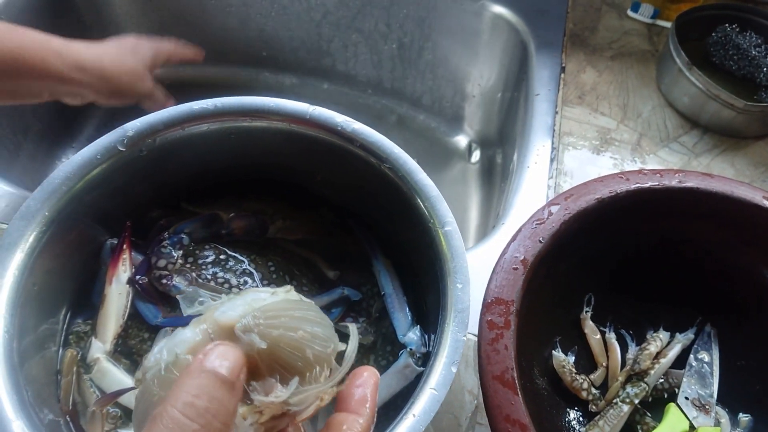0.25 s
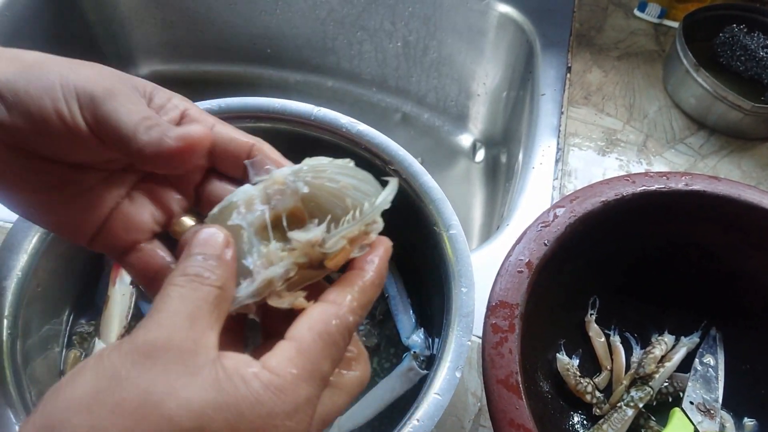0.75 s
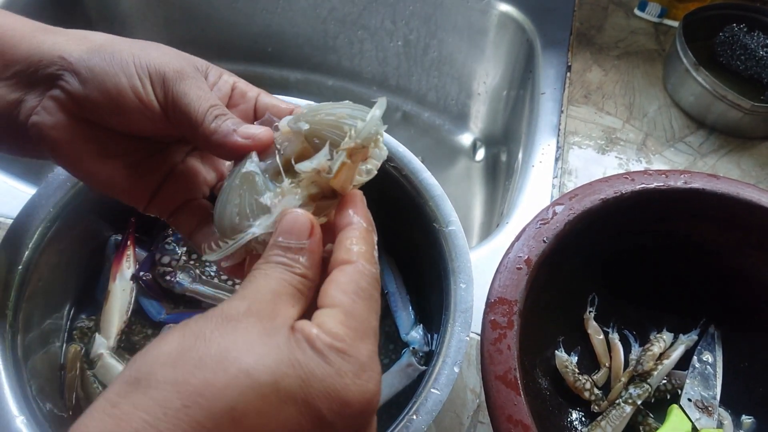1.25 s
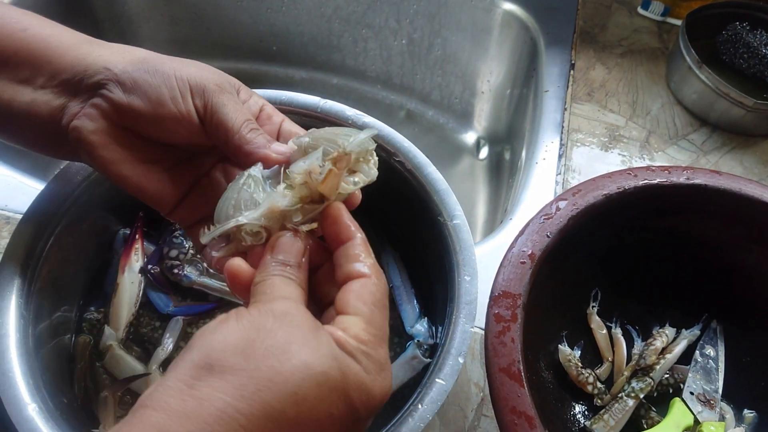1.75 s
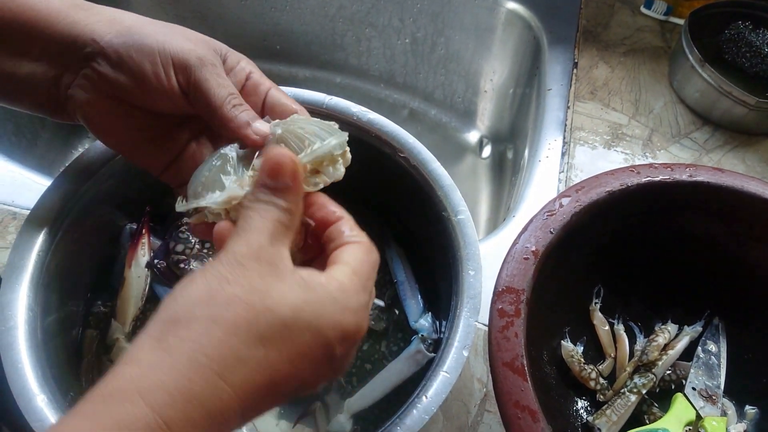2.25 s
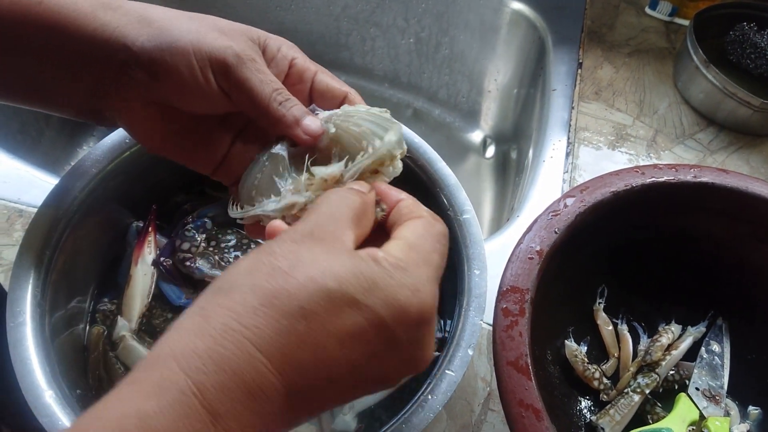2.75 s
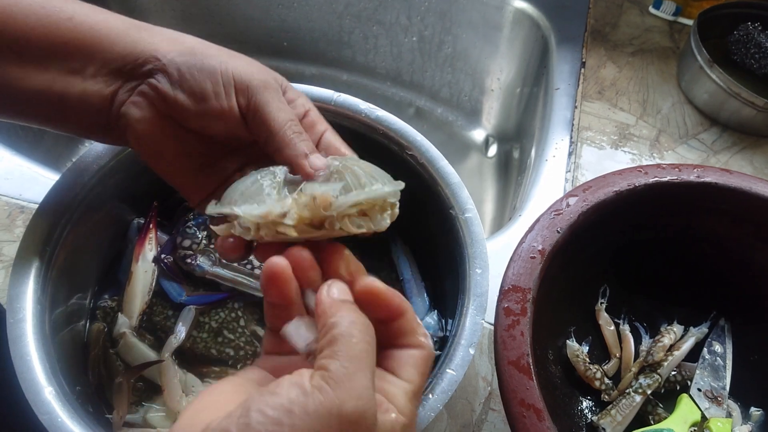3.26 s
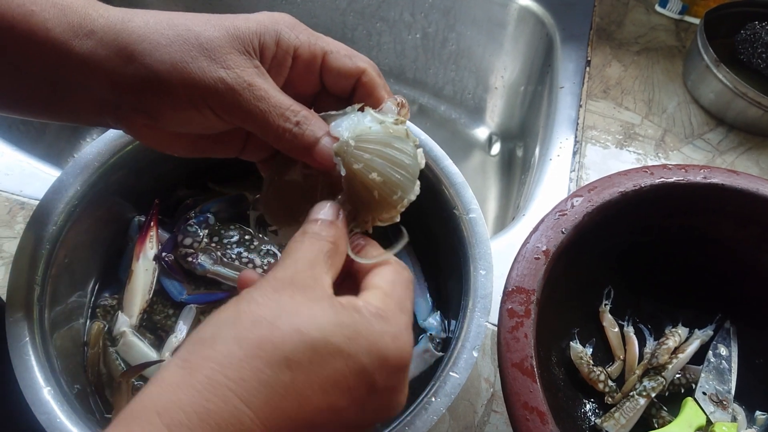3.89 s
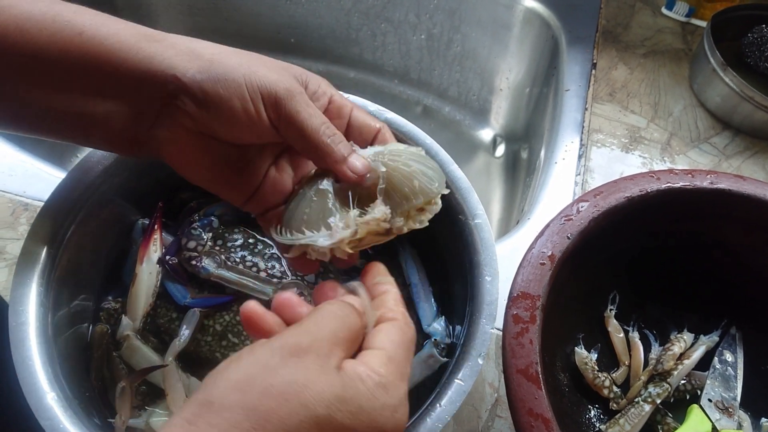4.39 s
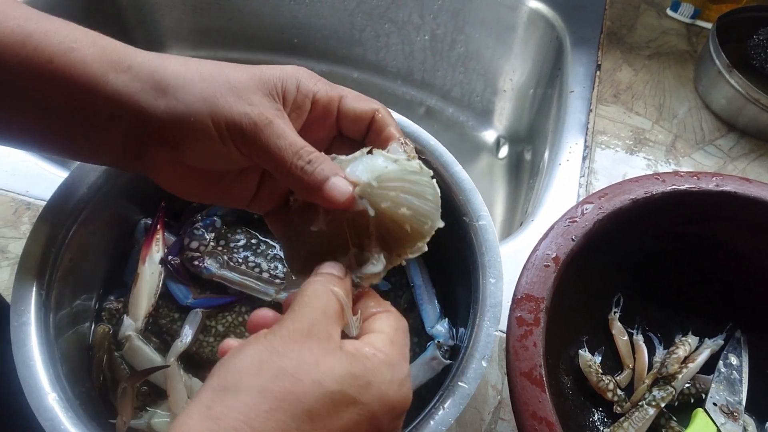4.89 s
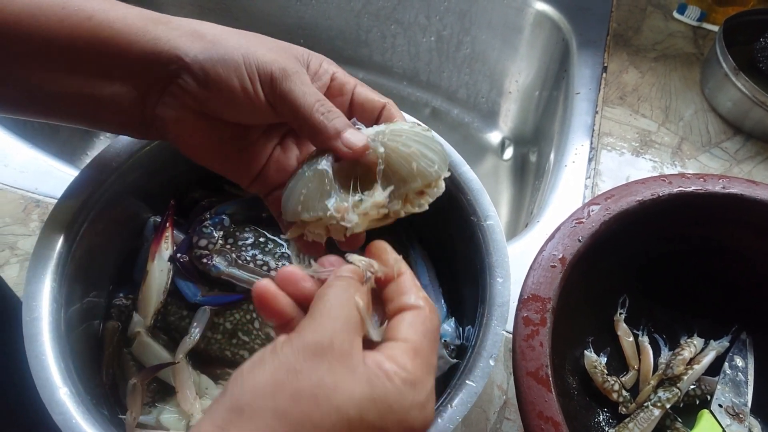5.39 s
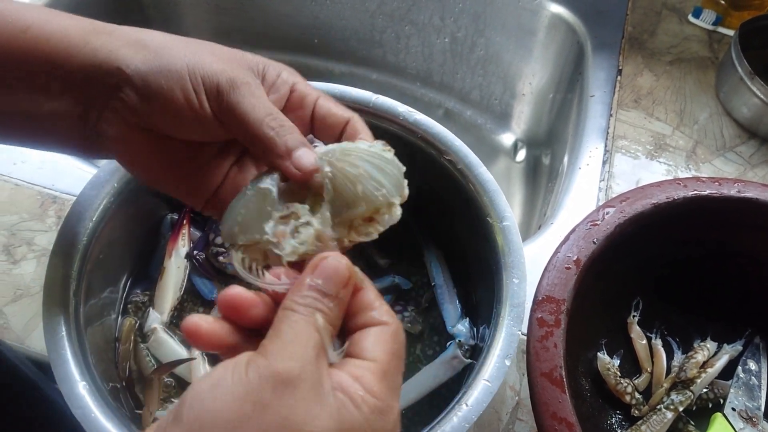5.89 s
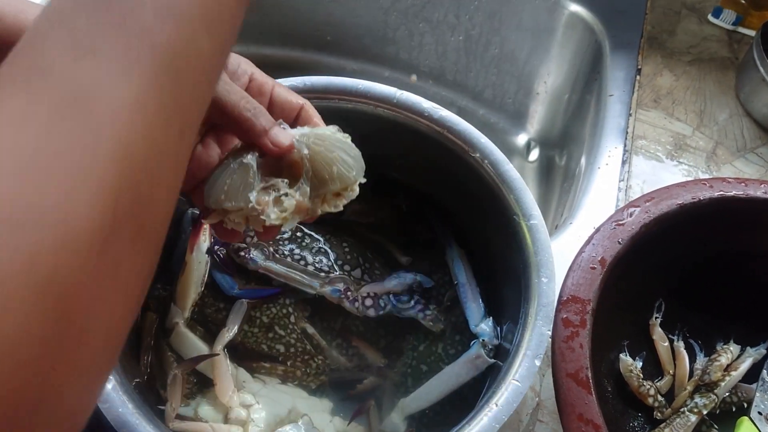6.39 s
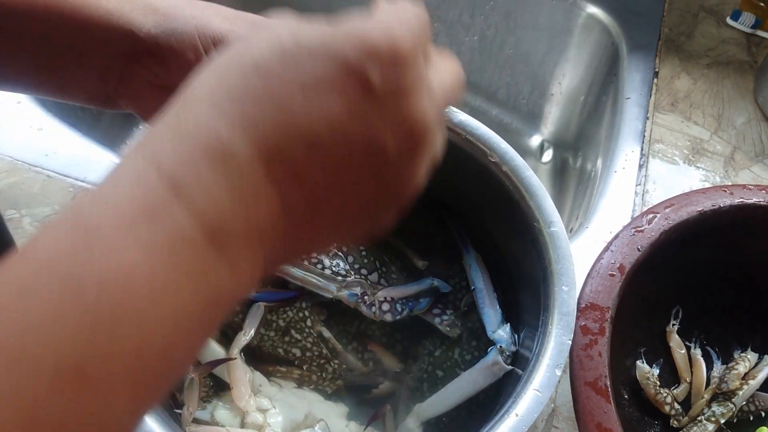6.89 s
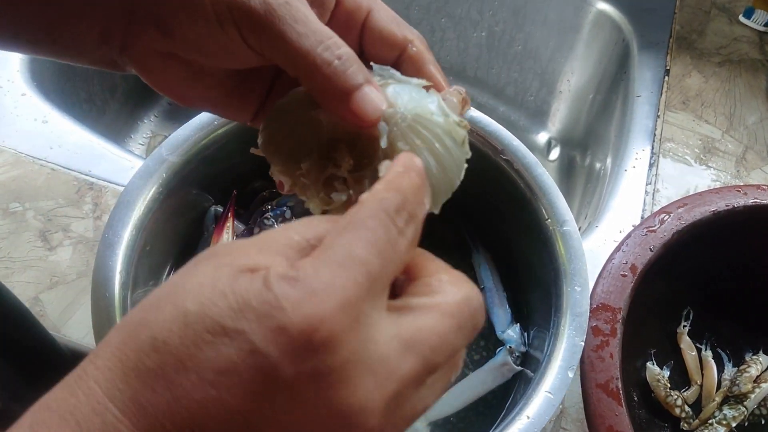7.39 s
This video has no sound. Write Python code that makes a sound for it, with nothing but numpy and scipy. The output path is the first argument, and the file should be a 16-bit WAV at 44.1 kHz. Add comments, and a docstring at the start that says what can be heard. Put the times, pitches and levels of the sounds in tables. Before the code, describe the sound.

In a quiet kitchen, a quick clatter rings a metal sink before thin crab shell starts snapping in someone's hands, close to the microphone. Scattered cracks, light clicks and dull thuds follow, with faint bird chirps and a distant engine gathering speed outside. Finally a soft drip falls and a torn-off piece hits the steel with a small bounce. Only the right channel carries the scene, with faint hiss on the left.

```python
"""Hands pull a raw crab apart over a steel kitchen sink. First something clatters into the basin and
sets it ringing. Then thin shell snaps close by, with soft thuds and crackling fibres. Small birds call
outside, and what seems a far engine gathers speed. Last, a drip lands in the pot below, and a torn-off
piece drops into the sink and bounces. Only the right microphone channel is live; the left just hisses."""
import sys
import numpy as np
from scipy import signal
from scipy.fft import rfft, irfft
from scipy.io import wavfile
from scipy.ndimage import uniform_filter1d

SR = 44100
rng = np.random.default_rng(int(sys.argv[2]) if len(sys.argv) > 2 else 0)


def store_wav(level_fs):
    """Save 16-bit WAV to argv[1]."""
    pcm = np.round(np.clip(np.atleast_2d(level_fs), -1, 1) * 32767)
    wavfile.write(sys.argv[1], SR, pcm.T.astype(np.int16))


N = 337365

# Each row: frequency in Hz, relative density in dB. Same columns in every *_SPECTRUM.
SHELL_SPECTRUM = [(100, -20), (400, -18), (600, -10), (850, -23.5), (1200, -8), (1700, -9), (2400, -9.5),
                  (3300, -9), (4600, 0.5), (6000, -10.5), (7800, -15.5), (9700, -0.5), (11500, 1.5),
                  (13000, -10), (14500, -4.5), (16000, -13)]
# Each row: start in seconds, relative level in dB, tilt in dB per octave.
SHELL_SNAPS = [(1.794, -43.5, .4), (1.8813, -56, 5), (2.0041, -31, 0.4), (2.0136, -42, 5),
               (3.068, -45, -3.5), (3.075, -36, -1.5), (4.1526, -53, -1), (4.2788, -54, -5),
               (5.086, -50.5, -2), (5.11, -53.5, -1), (5.115, -43, 9), (5.1582, -50, -2.5),
               (5.1749, -49.5, -1.5), (5.2846, -56, 7.5), (5.829, -54, 4), (5.857, -51.5, 10),
               (5.9542, -57, 7), (6.0424, -46, -2.5), (6.063, -51, -4)]


def shell_snaps(gain_db=5, uneven_db=9, hollow_hz=1500, pot_db=-11, pot_t60_s=.079, wet_db=-17):
    """Thin shell gives way in milliseconds; the pot just below and then the kitchen answer."""
    out = np.zeros(N)
    for s, db, tilt_db in SHELL_SNAPS:
        fracture_t60_s = .0115 * amp(.26 * (db + 56))  # louder fractures run longer
        hollow_db = .55 * (db + 44)  # big ones sound the hollow body, small ones stay thin
        click = amp(db + gain_db) * impulse(SHELL_SPECTRUM, tilt_db, hollow_hz, hollow_db, octaves=.62)
        add(out, s, burst(click, fracture_t60_s, uneven_db) + amp(pot_db) * burst(click, pot_t60_s))
    return out + amp(wet_db) * kitchen(out)[:N]


# Each row: centre in seconds, scatter in seconds, typical fibre level in dB.
FIBRE_PULLS = [(4.151, 0.075, -58.5), (4.938, 0.032, -58.5), (5.138, 0.011, -57), (5.871, .035, -58.5)]


def fibre_crackle(spread_db=3, tilt_db=-3.5, t60_s=.017, fibres=6):
    """Tiny fibres of shell let go at random during each slow pull."""
    out = np.zeros(N)
    click = impulse(SHELL_SPECTRUM, tilt_db)
    for s, scatter_s, db in FIBRE_PULLS:
        for when, size in rng.standard_normal((fibres, 2)):
            add(out, s + scatter_s * when, amp(db + spread_db * size) * burst(click, t60_s))
    return out


CLACK_SPECTRUM = [(100, -35), (400, -8.5), (600, 3.5), (800, -2), (1300, 11), (1600, 6.5), (2200, 6),
                  (3000, -0.5), (3900, 1), (5200, 0.5), (6500, -11.5), (7600, -24.5), (10800, -5),
                  (15500, -21)]
THUMP_SPECTRUM = [(30, -50), (75, -21), (135, -1), (190, -2), (290, -1.5), (450, -15), (800, -15.5),
                  (3000, -98)]
# Each row: mode frequency in Hz, relative level in dB, t60 in seconds.
BASIN_MODES = [(141, -7, .9), (188, -8, .45), (215, -10, .45), (276, 0, .72), (367, -8, .5), (394, -11, .8),
               (517, -18, .7), (608, -11, .4), (696, -13, .45), (926, -12, .3), (1020, -7, .35),
               (1152, -11, .3), (1215, -8, .2), (1409, -7, .28), (1490, -8, .22), (1748, -11, .2)]
# Each row: start in seconds, relative clack level in dB, resonance of the struck spot in Hz,
# contact t60 in seconds, relative push on the sink floor in dB.
SINK_BLOWS = [(0.2815, -20.5, 1850, 0.034, -25.5), (0.2929, -19.5, 1570, 0.035, -24),
              (0.3162, -20.5, 3950, 0.033, -25.5), (0.3212, -19.5, 3700, 0.03, -27.5),
              (0.327, -29, 960, .09, -33), (0.4266, -40.5, 2200, .022, -53),
              (0.462, -21.5, 4800, 0.02, -32), (0.4763, -28, 4400, 0.019, -18.5),
              (0.4879, -24.5, 2010, 0.015, -20.5), (0.5568, -36.5, 2270, 0.055, -30),
              (0.571, -38.5, 1400, 0.021, -32.5), (0.6139, -41.5, 4750, .02, -42.5),
              (0.633, -43, 4720, .016, -35.5), (0.6738, -48, 2300, 0.033, -37),
              (0.7449, -40.5, 2120, 0.012, -36)]


def sink_clatter(spot_db=9, thump_t60_s=.11, clack_wet_db=-6, thump_wet_db=-3, ring_db=-14):
    """Each blow clacks, thumps the sink floor and tops up the energy of the steel basin's modes."""
    out, fed_energy = np.zeros((2, N))
    t = np.arange(N) / SR
    for s, db, spot_hz, contact_t60_s, push_db in SINK_BLOWS:
        tilt_db = np.log2(spot_hz / 2000)  # a stiffer, higher spot is brighter
        clack = amp(db + 3.5) * impulse(CLACK_SPECTRUM, tilt_db, spot_hz, spot_db)
        thump = amp(push_db - .5) * impulse(THUMP_SPECTRUM)
        add(out, s, burst(clack, contact_t60_s, uneven_db=3, rise_s=.084 * contact_t60_s))
        add(out, s, burst(thump, thump_t60_s))
        add(out, s, kitchen(amp(clack_wet_db) * clack + amp(thump_wet_db) * thump))
        fed_energy[round(s * SR)] = amp(push_db + ring_db) ** 2
    for hz, db, t60_s in BASIN_MODES:
        energy = signal.lfilter([1], [1, -decay(1 / SR, t60_s) ** 2], fed_energy)
        out += amp(db) * np.sqrt(energy) * np.sin(2 * np.pi * (hz * t + rng.random()))
    return out


PIECE_SPECTRUM = [(100, -14), (450, -38), (720, 0), (900, -6.5), (1300, 3.5), (2000, -2.5), (2900, -8),
                  (3600, -6.5), (4700, -0.5), (6300, -8.5), (7800, -24.5), (10800, -4.5), (13000, -13),
                  (15200, -16)]
# Each row: mode frequency in Hz, relative level in dB, t60 in seconds.
LANDING_MODES = [(123, 2.5, 0.28), (726, -5, .14), (1118, 1, 0.13), (1207, 0, 0.17), (1466, 5.5, 0.11),
                 (1900, -3, 0.17), (4750, -1, 0.12)]
# Each row: start in seconds, relative level in dB, tilt in dB per octave, ring and thump offset in dB.
PIECE_BOUNCES = [(6.797, -51, 7, -28), (6.7991, -29.5, .5, -1.5), (6.8998, -44, 2, -2)]


def dropped_piece(contact_db=5, wet_db=-3, ring_db=-8, ring_rise_s=.0026, thump_db=-5):
    """Light shell lands and bounces on the steel, which thuds and rings."""
    out = np.zeros(N)
    t = np.arange(SR // 2) / SR
    ring = sum(amp(db) * decay(t, t60_s) * np.sin(2 * np.pi * hz * t) for hz, db, t60_s in LANDING_MODES)
    ring *= 1 - np.exp(-t / ring_rise_s)
    for s, db, tilt_db, spot_db in PIECE_BOUNCES:
        click = impulse(PIECE_SPECTRUM, tilt_db)
        add(out, s, amp(db + contact_db) * burst(click, t60_s=.06))
        add(out, s, amp(db + wet_db) * kitchen(click))
        add(out, s, amp(db + spot_db + ring_db) * ring)
        add(out, s, amp(db + spot_db + thump_db) * burst(impulse(THUMP_SPECTRUM), t60_s=.33))
    return out


THUD_SPECTRUM = [(50, -21), (150, -8), (300, -6.5), (700, -14), (1500, -22), (3000, -30), (8000, -67)]
# Each row: start in seconds, level in dB, length in seconds.
SOFT_THUDS = [(2.489, -54.5, 0.048), (2.555, -60.5, 0.079), (2.645, -66, 0.037), (6.541, -56.5, 0.057)]


def soft_thuds():
    """Dull, soft-edged thuds; the last is a drip into the pot."""
    out = np.zeros(N)
    for s, db, length_s in SOFT_THUDS:
        size = int(length_s * SR)
        add(out, s, amp(db) * noise(THUD_SPECTRUM, size) * signal.windows.tukey(size, .5))
    return out


# Each row: start in seconds, relative level in dB, mid pitch in Hz.
NEAR_CHIPS = [(0.86, -74.5, 5150), (2.04, -73.5, 4820), (2.42, -75, 4570), (2.62, -75, 4470),
              (4.69, -73.5, 4500), (5.311, -69.5, 4530), (5.51, -66, 4460), (5.748, -66.5, 4480),
              (6.897, -71, 5200)]
# Each row: start in seconds, relative level in dB.
NEAR_SLIDES = [(3.36, -74.5), (4.375, -71.5), (5.53, -73.5)]


def near_bird(chip_s=.134, chip_sag=.027, slide_s=.18, slide_swell_db=4, direct_db=-5, wet_db=-4):
    """A small bird outside gives nearly level chips and whistles that swell as they fall."""
    song = np.zeros(N)
    sag = np.linspace(1 + chip_sag, 1 - chip_sag, int(chip_s * SR))
    for s, db, hz in NEAR_CHIPS:
        add(song, s, amp(db) * unit_rms(whistle(hz * sag, waver=.0498) * np.hanning(len(sag))))
    glide_hz = np.geomspace(8100, 4250, int(slide_s * SR))
    swell = np.hanning(len(glide_hz)) * amp(np.linspace(0, slide_swell_db, len(glide_hz)))
    for s, db in NEAR_SLIDES:
        add(song, s, amp(db) * unit_rms(whistle(glide_hz, waver=.024) * swell))
    return amp(direct_db) * song + amp(wet_db) * kitchen(song, stretch=3.7)[:N]


# Each row: start in seconds, relative level in dB, top pitch in Hz.
FAR_CALLS = [(3.14, -70, 3070), (3.539, -69.5, 3015), (3.871, -67, 2980), (4.179, -69.5, 3056),
             (4.5, -69, 3155), (4.861, -70.5, 3095)]


def far_bird(call_s=.22, pitch_drop=.39, swell_db=5, direct_db=-9, wet_db=-1):
    """A held note falls away and turns raspy, heard mostly as long reflections."""
    song = np.zeros(N)
    t = np.arange(0, call_s, 1 / SR)
    fall = pitch_drop * ease(t, at_s=.12, width_s=.02)
    waver = .0204 + .082 * fall
    swell = signal.windows.tukey(len(t), .3) * amp(swell_db * t / call_s)
    for s, db, top_hz in FAR_CALLS:
        add(song, s, amp(db) * unit_rms(whistle(top_hz * (1 - fall), waver) * swell))
    return amp(direct_db) * song + amp(wet_db) * kitchen(song, stretch=3.3)[:N]


def far_engine(slow_hz=159, fast_hz=195, slow_db=-73, rise_db=9, flutter=.31, orders=(1, .83, 1.16)):
    """A fluttering hum climbs in pitch and level with speed; its upper order enters near full speed."""
    speed = ease(np.arange(N) / SR, at_s=4.8, width_s=.6)
    phase = 2 * np.pi * np.cumsum(slow_hz + (fast_hz - slow_hz) * speed) / SR
    main, low, high = (unit_rms((1 + flutter * band(0, 40)) * np.sin(k * phase)) for k in orders)
    hum = main + amp(-4) * low + amp(-2) * speed ** 7.1 * high
    return amp(slow_db + rise_db * speed) * hum


def road_noise(far_db=-76, rise_db=7):
    """The far vehicle's road noise comes into the open late."""
    in_the_open = ease(np.arange(N) / SR, at_s=6.55, width_s=.05)
    return amp(far_db + rise_db * in_the_open) * band(1200, width_hz=240)


RUMBLE_SPECTRUM = [(20, -35), (45, -3.5), (68, 4), (120, -3), (270, -12), (480, -15), (750, -18),
                   (1200, -16), (1700, -18), (2400, -22), (3000, -32), (4600, -27), (6000, -38.5),
                   (7500, -73)]
# Each row: centre in Hz, width in Hz, rms level in dB.
OUTDOOR_DRONES = [(61.3, 5.8, -64), (876, 37, -76.5), (1840, 97, -79), (2373, 64, -78)]


def outdoors(rumble_db=-59, waver_db=.86):
    """Low, gently wavering rumble and faint drones of the neighbourhood."""
    rumble = amp(rumble_db + waver_db * band(0, 6.4)) * noise(RUMBLE_SPECTRUM, N)
    return rumble + sum(amp(db) * band(hz, width_hz) for hz, width_hz, db in OUTDOOR_DRONES)


# Each row: frequency in Hz, t60 in seconds.
KITCHEN_DECAY = [(120, 0.25), (400, 0.5), (1200, 0.34), (2500, 0.23), (5000, 0.21), (11000, 0.2),
                 (16000, 0.12)]


def kitchen(x, stretch=1, rise_s=.002):
    """Dense reflections from steel and walls, each band dying at its own rate."""
    hz, t, bands = signal.stft(rng.standard_normal(SR), SR, nperseg=256)
    t60_s = stretch * curve_at(KITCHEN_DECAY, hz)[:, None]
    tail = signal.istft(bands * decay(t, t60_s), SR, nperseg=256)[1]
    tail *= 1 - np.exp(-(np.arange(len(tail)) / SR / rise_s) ** 2)
    return signal.fftconvolve(x, tail / np.linalg.norm(tail))


def impulse(spectrum, tilt_db=0, peak_hz=1000, peak_db=0, octaves=.14, size=8192):
    """Minimum-phase click with a per-octave tilt and one resonance; energy of 2 ms at full level."""
    hz = abs(np.fft.fftfreq(size, 1 / SR)) + 1
    db = curve_at(spectrum, hz) + tilt_db * np.log2(np.maximum(hz, 500))
    db += peak_db * np.exp(-(np.log2(hz / peak_hz) / octaves) ** 2)
    log_response = np.conj(signal.hilbert(np.log(amp(db))))
    click = np.fft.ifft(np.exp(log_response)).real[:size // 2]
    return click / np.linalg.norm(click) * np.sqrt(.002 * SR)


def burst(click, t60_s, uneven_db=0, rise_s=0, size=4096):
    """Spreads a click's energy over a dying shower of impulses; in brittle shell a few stand far out."""
    impulses, heights = rng.standard_normal((2, size))
    t = np.arange(1, size + 1) / SR
    shower = impulses * amp(uneven_db * heights) * decay(t, t60_s) * t / (t + rise_s)
    sound = signal.fftconvolve(shower, click)
    return sound * np.linalg.norm(click) / np.linalg.norm(sound)


def whistle(hz, waver, twitter_db=6.5):
    """A sine made raspy by a quick pitch tremble and broken up by an uneven level."""
    tremble = unit_rms(uniform_filter1d(rng.standard_normal(len(hz)), size=70))
    twitter = unit_rms(uniform_filter1d(rng.standard_normal(len(hz)), size=500))
    phase = 2 * np.pi * np.cumsum(hz * (1 + waver * tremble)) / SR
    return amp(twitter_db * twitter) * np.sin(phase)


def noise(spectrum, size):
    """Steady shaped noise, rms 1."""
    gain = amp(curve_at(spectrum, np.fft.rfftfreq(size, 1 / SR)))
    return unit_rms(irfft(rfft(rng.standard_normal(size)) * gain, size))


def band(hz, width_hz):
    """Narrow noise, rms 1."""
    detuning = 2 * (np.fft.rfftfreq(N, 1 / SR) - hz) / width_hz
    return unit_rms(irfft(rfft(rng.standard_normal(N)) / (1 + detuning ** 2), N))


def ease(t, at_s, width_s):
    """Smooth step from 0 to 1, centred on at_s."""
    return .5 + .5 * np.tanh((t - at_s) / (2 * width_s))


def decay(t, t60_s):
    return np.exp(-np.log(1000) * t / t60_s)


def amp(db):
    return 10 ** (np.asarray(db) / 20)


def unit_rms(x):
    return x / np.sqrt(np.mean(x ** 2) + 1e-20)


def curve_at(points, hz):
    point_hz, values = np.transpose(points)
    return np.interp(np.log(hz + 1), np.log(point_hz + 1), values)


def add(mix, s, sound):
    part = mix[round(s * SR):][:len(sound)]
    part += sound[:len(part)]


RIGHT_HISS_SPECTRUM = [(100, -63), (5600, -16.5), (6500, 1.5), (7000, -9.5), (7500, -49), (8400, -22),
                       (9100, -12), (9550, 5), (10300, -7), (12000, -11), (15600, -16.5), (16200, -44)]
LEFT_HISS_SPECTRUM = [(20, 3.5), (70, 0.5), (500, -10.5), (5000, -21), (6300, -31), (7500, -42),
                      (9100, -45), (10500, -22.5), (15600, -22), (16200, -38)]


def scene(right_hiss_db=-72, left_hiss_db=-71):
    """All sources and microphone hiss on the right; only idle hiss on the left."""
    right = outdoors() + amp(right_hiss_db) * noise(RIGHT_HISS_SPECTRUM, N)
    right += sink_clatter() + dropped_piece()
    right += shell_snaps() + fibre_crackle() + soft_thuds()
    right += near_bird() + far_bird() + far_engine() + road_noise()
    left = amp(left_hiss_db) * noise(LEFT_HISS_SPECTRUM, N)
    return np.array([left, right])


def record(dry, cutoff_hz=16100):
    """The recorder's band limit."""
    lowpass = signal.firwin(511, cutoff_hz, window=("kaiser", 9), fs=SR)
    return signal.oaconvolve(dry, lowpass[None], "same")


dry = scene()
out = record(dry)
store_wav(out)
```